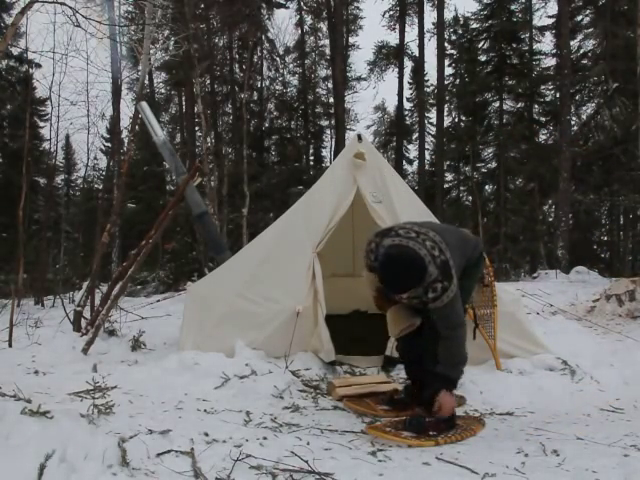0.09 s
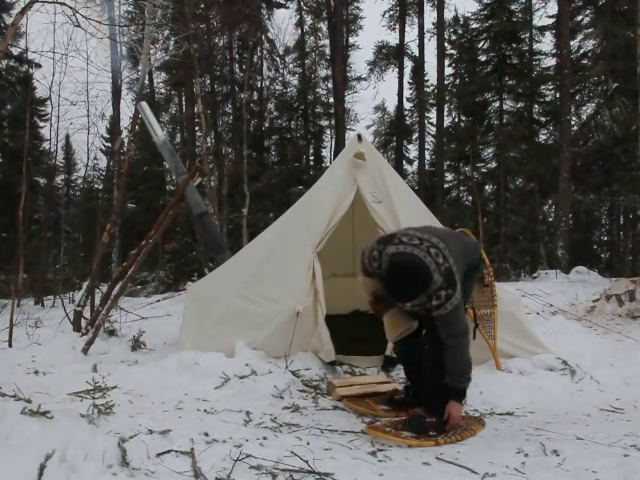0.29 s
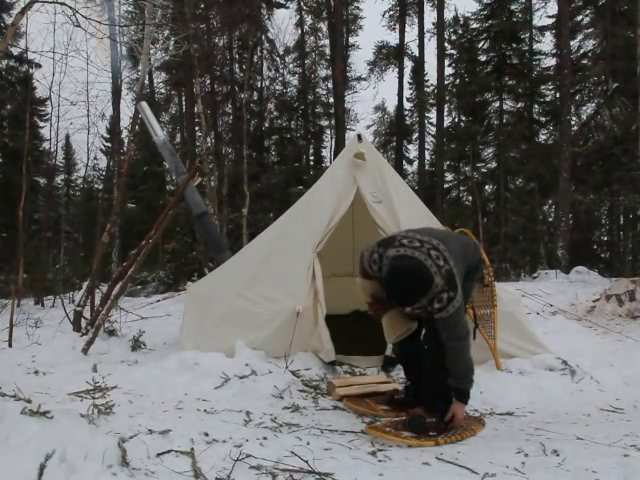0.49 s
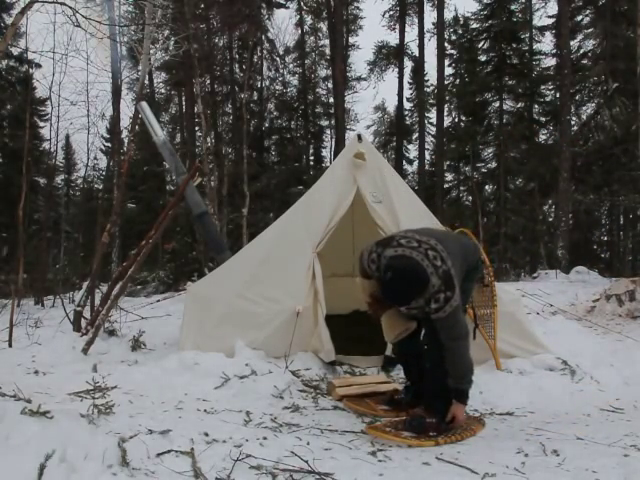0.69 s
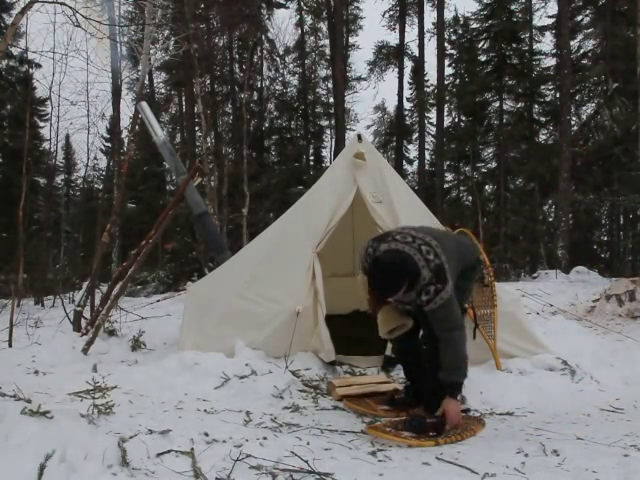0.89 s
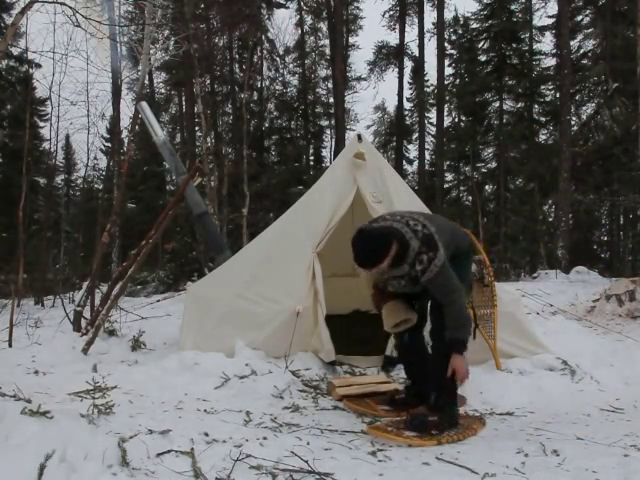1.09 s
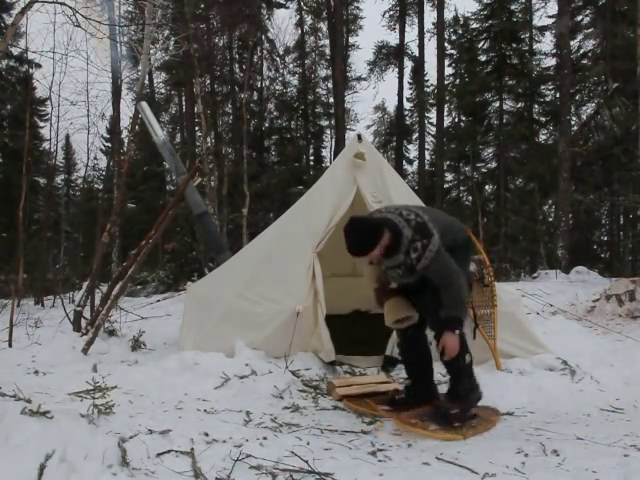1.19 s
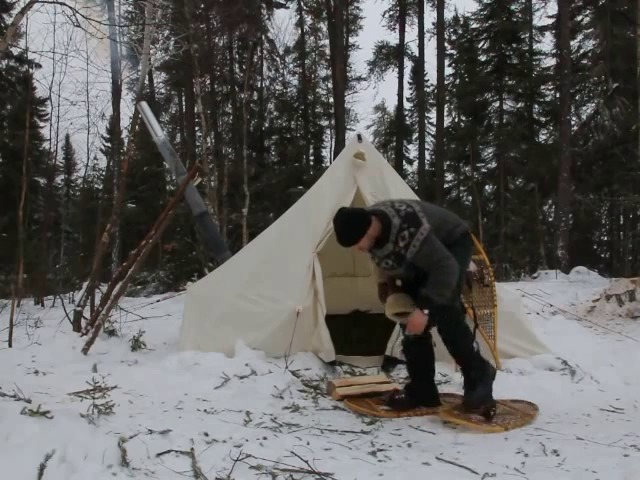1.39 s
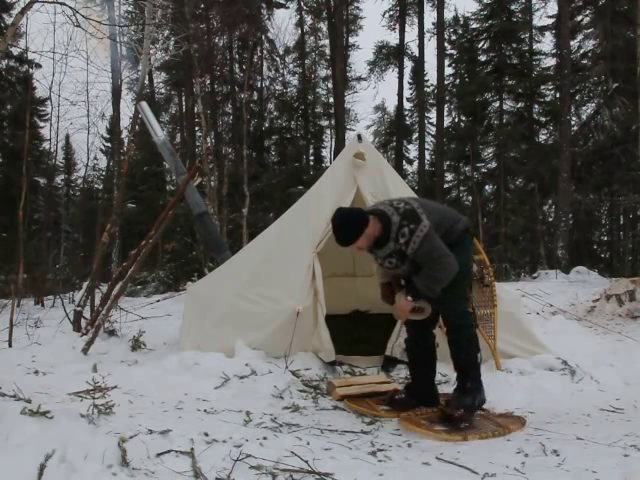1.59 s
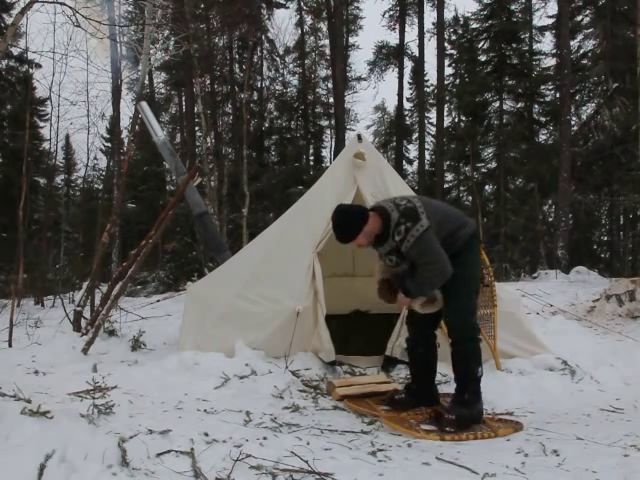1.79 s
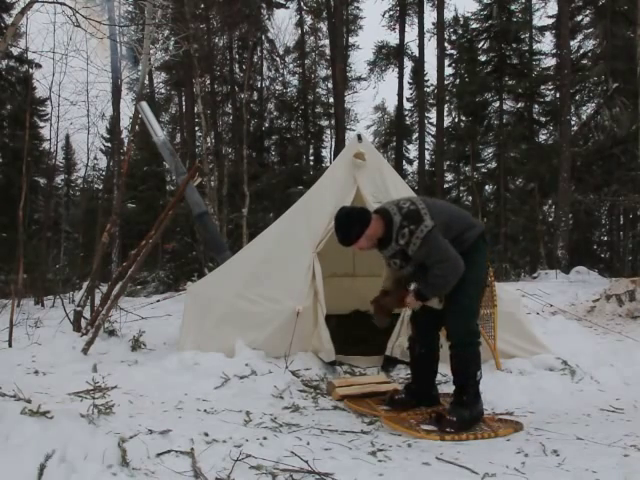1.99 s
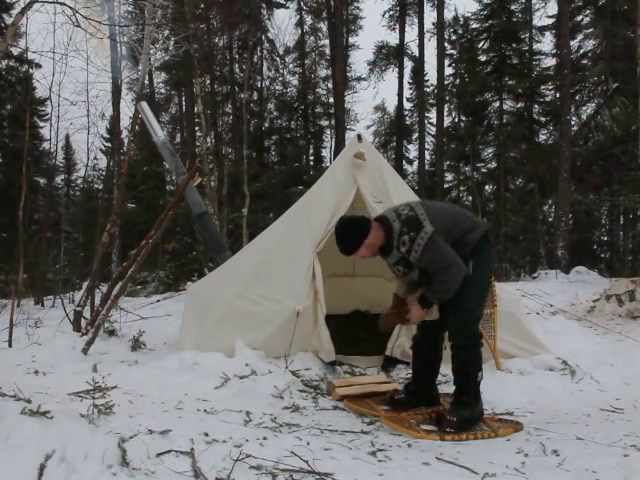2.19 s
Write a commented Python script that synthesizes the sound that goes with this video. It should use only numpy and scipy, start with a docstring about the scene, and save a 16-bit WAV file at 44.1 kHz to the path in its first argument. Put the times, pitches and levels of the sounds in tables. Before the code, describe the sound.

A wooden snowshoe is tugged and shifted on crusted snow. A faint tick comes first, then a hard knock at 0.2 s and lighter rattling taps. Sharp snaps and knocks cluster at 0.55-0.7 s. From 0.87 s, clacks, icy cracks and gritty crunching thicken, strongest to about 1.5 s, then continue in broken patches and fade after 2 s. Dry outdoor air, faint steady camera noise.

```python
"""Wooden knocks come first, faint and then hard, as a person tugs a snowshoe binding loose on crusted snow.
Frame and lacing are struck resonators; ice crust and twigs snap as short noise bursts, and a settling
shoe thumps as a damped low oscillation. Snow crunches as dense random grains and short pitched rings.
The snowy forest is dry and quiet: a brief scattered tail, over the faint coloured noise of the camera."""
import sys
import numpy as np
from scipy import signal
from scipy.io import wavfile
from scipy.ndimage import uniform_filter1d

SR = 44100
rng = np.random.default_rng(int(sys.argv[2]) if len(sys.argv) > 2 else 0)


def convert_level_to_amplitude(level_db):
    """Map a level in decibels to its linear amplitude factor."""
    exponent = np.asarray(level_db, float) / 20
    return 10 ** exponent


def int16_out(signal):
    """Quantize to a 16-bit WAV file."""
    q = np.round(np.clip(np.atleast_2d(signal).T, -1, 1) * 32767)
    wavfile.write(sys.argv[1], SR, q.astype(np.int16))


N = 99225  # samples


# Modes of the wooden frame: (f/Hz, level/dB before weighting by pitch and decay, 60 dB decay time t60/s)
FRAME_MODES = [(538, 5, 0.015), (750, 5, 0.012), (937, -0.5, 0.036), (1150, 5, 0.012), (1450, -30, 0.016),
               (1652, -0.5, 0.021)]


def knock(peak_db, hz, slip_s, noise, draw):
    """Stick-slip excitation of modes: random slips ring the frame modes near the pitch and the spot itself."""
    slips_per_s, soft_hz = 1500, 3000
    reach_octaves, spot_width_hz, frame_db = 1.36, 550, 3  # frame_db: frame peak relative to spot peak
    rise_s = 0.3 * slip_s

    slips = draw < slips_per_s / SR
    slips[int(rise_s * SR)] = True  # at least one slip
    impulses = slips * np.sign(noise) * (0.5 + abs(noise))
    drive = burst(slip_s, impulses, rise_s)
    drive = signal.lfilter(*signal.butter(2, soft_hz, fs=SR), drive)

    frame = 0
    for mode_hz, mode_db, t60 in FRAME_MODES:
        octaves_away = np.log2(mode_hz / hz)
        gain = convert_level_to_amplitude(mode_db - 6 * (octaves_away / reach_octaves) ** 2) * t60 / 0.03
        frame = frame + gain * resonate(drive, mode_hz, 2.2 / t60)  # bandwidth is 2.2 / t60
    spot = resonate(resonate(drive, hz, spot_width_hz), hz, 2 * spot_width_hz)
    return peaked(peaked(spot, 0) + peaked(frame, frame_db), peak_db)


# Knocks and creaks of the wooden frame: (t/s, dry peak level/dB, pitch f/Hz, length of the slip/s)
FRAME_KNOCKS = [(0.06, -38, 800, 0.0028), (0.176, -22.5, 557, 0.003), (0.2148, -9.5, 1170, 0.006),
                (0.245, -24, 1250, 0.0044), (0.287, -22, 1270, 0.0025), (0.319, -21.5, 1300, 0.0027),
                (0.38, -22, 1290, 0.0077), (0.414, -36, 1230, 0.0029), (0.433, -24, 1190, 0.0013),
                (0.562, -18.5, 1290, 0.0046), (0.5785, -27, 1380, 0.0054), (0.593, -24.5, 1110, 0.0065),
                (0.627, -11, 1050, 0.0046), (0.651, -17.5, 1260, 0.004), (0.671, -22.5, 1310, 0.0063),
                (0.695, -31.5, 670, 0.0029), (0.753, -32.5, 1400, 0.0076), (0.874, -28, 1150, 0.0068),
                (0.892, -12.5, 1560, 0.0017), (0.902, -11.5, 1340, 0.007), (0.932, -22, 1910, 0.0063),
                (0.982, -18.5, 1880, 0.0035), (0.993, -25, 1080, 0.0047), (1.019, -16.5, 2160, 0.0016),
                (1.033, -17, 510, 0.003), (1.139, -26.5, 560, 0.004), (1.165, -17, 1230, 0.0037),
                (1.188, -15.5, 1480, 0.0037), (1.2, -22.5, 1070, 0.0038), (1.213, -19, 1430, 0.0051),
                (1.244, -19, 930, 0.0033), (1.258, -13, 920, 0.0077), (1.33, -17.5, 1210, 0.0048),
                (1.4105, -17.5, 1470, 0.002), (1.469, -24.5, 990, 0.003), (1.603, -19.5, 1280, 0.0049),
                (1.635, -19, 617, 0.0039), (1.677, -19, 1450, 0.0059), (1.824, -15.5, 400, 0.0049),
                (1.892, -18, 1460, 0.0039), (1.933, -23, 930, 0.0047), (1.987, -17.5, 1500, 0.0036),
                (2.0, -26.5, 1450, 0.0031), (2.029, -27, 1480, 0.004), (2.073, -32, 695, 0.0085)]


def frame_knocks():
    """Superposition of the frame's stick-slip events, each with its own random drive."""
    layer = np.zeros(N)
    noises, draws = rng.standard_normal((99, 3000)), rng.random((99, 3000))
    for (t, *row), noise, draw in zip(FRAME_KNOCKS, noises, draws):
        add(layer, t, knock(*row, noise, draw))
    return layer


# Spectrum of a snap: (f/Hz, gain/dB)
SNAP_SPECTRUM = [(1200, -39.5), (2200, -2), (4000, -2), (8000, 1), (12000, -10), (15500, -9.5),
                 (17000, -49)]


def snap(peak_db, hz, noise, grit):
    """Brittle fracture as a gritty noise burst, with a broad resonance about its centre frequency."""
    fall_s, rise_s, grit_db = 0.0028, 0.000654, 4.5
    centre_db, sharpness = 7, 3.0  # sharpness: centre over width
    roughness = convert_level_to_amplitude(grit_db * np.repeat(grit, 24))
    drive = burst(fall_s, noise * roughness, rise_s)
    centre = convert_level_to_amplitude(centre_db) * resonate(drive, hz, hz / sharpness)
    return peaked(colour(drive + centre, SNAP_SPECTRUM), peak_db)


# Snaps of ice crust and twigs: (t/s, dry peak level/dB, centre f/Hz)
CRUST_SNAPS = [(0.1575, -32, 3000), (0.176, -30, 3670), (0.2155, -13, 4830), (0.2243, -21, 6100),
               (0.2573, -27, 5870), (0.3069, -21.5, 3040), (0.3835, -19.5, 3070), (0.415, -24, 3940),
               (0.4657, -29.5, 5970), (0.5172, -24.5, 5360), (0.551, -8.5, 7400), (0.595, -21.5, 3850),
               (0.627, -13, 3300), (0.6704, -23, 3000), (0.6833, -15, 3740), (0.686, -6.5, 4240),
               (0.69, -16, 7940), (0.6957, -21.5, 8000), (0.7336, -24.5, 4060), (0.7547, -25, 4140),
               (0.833, -27, 4670), (0.8733, -22, 3700), (0.8949, -17, 7350), (0.9334, -18.5, 3360),
               (0.9639, -15.5, 3350), (0.9817, -16, 3220), (1.0117, -34, 8400), (1.018, -11.5, 3170),
               (1.0253, -33, 8900), (1.0555, -20, 4540), (1.0903, -14, 7450), (1.167, -11.5, 3100),
               (1.191, -10, 3770), (1.292, -19, 3970), (1.3525, -24, 3280), (1.3838, -16.5, 7500),
               (1.39, -24.5, 7600), (1.4394, -24.5, 4200), (1.468, -18.5, 3960), (1.4818, -24, 4000),
               (1.7264, -16, 3350), (1.748, -20, 5170), (1.7803, -17.5, 9850), (1.9879, -23, 3450)]


def crust_snaps():
    """Superposition of brittle fractures, each with its own noise."""
    layer = np.zeros(N)
    noises, grits = rng.standard_normal((99, 2400)), rng.standard_normal((99, 100))
    for (t, *row), noise, grit in zip(CRUST_SNAPS, noises, grits):
        add(layer, t, snap(*row, noise, grit))
    return layer


def thump(peak_db, hz):
    """Heavily damped oscillation: a low push that dies within a few cycles."""
    cycles = 1.9
    u = np.arange(3000) / SR * hz  # time in cycles
    return peaked(np.sin(2 * np.pi * u) * u * np.exp(-3 * u / cycles), peak_db)


# Dull thumps of a shoe settling: (t/s, dry peak level/dB, pitch f/Hz)
SHOE_THUMPS = [(.216, -19.5, 473), (.628, -24.5, 334), (0.89, -20, 526), (1.355, -25, 276),
               (1.824, -27, 380)]


def shoe_thumps():
    """Superposition of the damped pushes of a settling shoe."""
    layer = np.zeros(N)
    for t, *row in SHOE_THUMPS:
        add(layer, t, thump(*row))
    return layer


def scatter(hits):
    """Diffuse scattering: a short, exponentially decaying noise tail is added to the hits."""
    tail_db, t60 = -17, 0.04  # energy of the tail relative to the direct sound; decay time in s
    t = np.arange(4000) / SR
    tail = rng.standard_normal(4000) * convert_level_to_amplitude(-60 * t / t60)
    return hits + convert_level_to_amplitude(tail_db) * signal.oaconvolve(hits, tail / np.linalg.norm(tail))[:N]


# Spectrum of the low crunch: (f/Hz, gain/dB)
CRUNCH_SPECTRUM = [(47, -58), (150, -21), (311, -3), (831, -1.5), (917, -2.5), (2410, -8.5), (4000, -8.5),
                   (5600, -59)]
# Spectrum of the hiss of fine grains: (f/Hz, gain/dB)
HISS_SPECTRUM = [(1060, -11), (1800, -2), (2360, -7.5), (3780, -6), (11700, -10.5), (15600, -21),
                 (16500, -62)]


def snow():
    """Granular emission: low crunch and fine hiss, each part noisy grains and part pitched rings."""
    clod_share, chip_share = 0.65, 0.35  # pitched share of the power
    crunch = grains(column=1, points=CRUNCH_SPECTRUM, per_s=700, spread_db=2.0,
                    clump_db=4.5, clump_s=0.0027, grain_s=0.00067)
    # compacted clods of snow
    clods = pitched_pieces(column=1, points=CRUNCH_SPECTRUM, range_hz=(300, 2400), cycles=6.0,
                           per_s=550, spread_db=2.5, count=24)
    hiss = grains(column=2, points=HISS_SPECTRUM, per_s=2600, spread_db=3.6,
                  clump_db=0.8, clump_s=0.006, grain_s=0.0006)
    # ticking chips of ice
    chips = pitched_pieces(column=2, points=HISS_SPECTRUM, range_hz=(2210, 13830), cycles=3.4,
                           per_s=1400, spread_db=1.0, count=24)
    low = np.sqrt(1 - clod_share) * crunch + np.sqrt(clod_share) * clods
    high = np.sqrt(1 - chip_share) * hiss + np.sqrt(chip_share) * chips
    return low + high


def grains(column, points, per_s, spread_db, clump_db, clump_s, grain_s):
    """Shot noise: random grains, summed in power, modulate noise that swells in clumps."""
    size = random_sizes(per_s, spread_db, 4)
    shape = np.exp(-np.arange(600) / SR / grain_s)
    span = max(int(clump_s * SR), 1)
    clumps = evened(uniform_filter1d(uniform_filter1d(rng.standard_normal(N), span), span))
    envelope = np.sqrt(abs(signal.oaconvolve(size ** 2, shape ** 2)[:N]))
    noise = envelope * rng.standard_normal(N) * convert_level_to_amplitude(clump_db * clumps)
    return evened(colour(noise, points)) * pressure(column)


def pitched_pieces(column, points, range_hz, cycles, per_s, spread_db, count):
    """Impulse response of small resonators: each piece rings briefly at one of count pitches."""
    size = random_sizes(per_s, spread_db, 3)
    kind, out = rng.integers(0, count, N), np.zeros(N)
    for k, hz in enumerate(np.geomspace(*range_hz, count)):
        u = np.arange(1500) / SR * hz  # time in cycles
        ring = np.sin(2 * np.pi * u) * u * np.exp(-3 * u / cycles) * hz
        out += signal.oaconvolve(size * (kind == k), ring)[:N]
    return evened(colour(out, points)) * pressure(column)


def random_sizes(per_s, spread_db, limit):
    """Poisson-like arrivals: impulses at random times, with exponentially spread levels up to a limit."""
    size = convert_level_to_amplitude(spread_db * np.minimum(rng.exponential(1, N), limit))
    return size * (rng.random(N) < per_s / SR)


# Slow course of the crushing: (t/s, low crunch level/dB, fine hiss level/dB)
CRUSH_COURSE = [(0, -55, -59.5), (.15, -56, -57), (.45, -52.5, -51.5), (.49, -61.5, -56), (.6, -46, -45.5),
                (.78, -61.5, -53.5), (.86, -42.5, -44), (1.02, -41.5, -39.5), (1.2, -41, -38),
                (1.5, -44.5, -37), (1.62, -44.5, -46.5), (1.85, -42.5, -43), (1.98, -46, -48),
                (2.04, -53, -55), (2.25, -53, -53.5)]
# Patches of crust giving way: (start t/s, length/s, low crunch level/dB, fine hiss level/dB)
CRUST_BREAKS = [(0.3, 0.01, -40, -43), (0.314, 0.023, -47, -43), (0.454, 0.01, -67, -44.5),
                (0.681, 0.014, -38, -39), (0.891, 0.037, -34, -25.5), (1.073, 0.08, -45.5, -35.5),
                (1.17, 0.033, -36, -32.5), (1.232, 0.025, -27, -37), (1.286, 0.059, -27.5, -37.5),
                (1.37, 0.021, -54, -37), (1.417, 0.015, -33, -35), (1.448, 0.053, -39, -34.5),
                (1.581, 0.031, -36, -37.5), (1.634, 0.068, -36.5, -37.5), (1.711, 0.042, -35.5, -35),
                (1.778, 0.012, -34.5, -38.5), (1.815, 0.031, -38, -35), (1.909, 0.016, -31, -35.5),
                (1.954, 0.0094, -30, -37.5), (2.119, 0.02, -49, -50.5)]


def pressure(column):
    """Addition of powers: the slow crushing plus the gated patches, returned as an amplitude gain."""
    rise_s, fall_s = 0.0015, 0.006
    t = np.arange(N) / SR
    power = convert_level_to_amplitude(2 * np.interp(t, *np.transpose(CRUSH_COURSE)[[0, column]]))
    for row in CRUST_BREAKS:
        start, end = row[0], row[0] + row[1]
        gate = np.minimum((t - start) / rise_s, (end - t) / fall_s + 0.5)
        power = power + convert_level_to_amplitude(2 * row[column + 1]) * np.clip(gate, 0, 1) ** 2
    return np.sqrt(power)


# Spectrum of the background: (f/Hz, gain/dB)
FLOOR_SPECTRUM = [(24, -87), (40, -16), (181, 1), (1400, -2.5), (2040, -12.5), (3550, -6.5), (11900, -44),
                  (15300, -33), (16500, -59)]


def floor():
    """Stationary coloured noise of forest and camera."""
    return convert_level_to_amplitude(-56) * evened(colour(rng.standard_normal(N), FLOOR_SPECTRUM))


def evened(x):
    """Power normalisation: scales to rms 1."""
    return x / np.sqrt(np.mean(x ** 2) + 1e-20)


def peaked(x, db):
    """Peak normalisation: scales to a peak level in dB."""
    return convert_level_to_amplitude(db) * x / (abs(x).max() + 1e-20)


def add(mix, s, sound):
    """Linear superposition: mixes a sound in at a time in seconds."""
    part = mix[round(s * SR):][:len(sound)]
    part += sound[:len(part)]


def colour(x, points):
    """Minimum-phase filtering: a causal filter that follows a spectrum of (Hz, dB) points."""
    f, db = np.transpose(points)
    hz = abs(np.fft.fftfreq(4096, 1 / SR))
    gain_db = np.interp(np.log(hz + 1), np.log(f), db)
    log_gain = np.log(convert_level_to_amplitude(np.maximum(gain_db, -100)))
    # the Hilbert transform of the log gain yields the phase
    taps = np.fft.ifft(np.exp(np.conj(signal.hilbert(log_gain)))).real[:2048]
    return signal.oaconvolve(x, taps)[:len(x)]


def resonate(x, hz, width_hz):
    """Second-order resonance with gain 1 at its centre."""
    return signal.lfilter(*signal.iirpeak(min(hz, 0.45 * SR), max(hz / width_hz, 0.3), SR), x)


def burst(fall_s, carrier, rise_s):
    """Amplitude envelope: a squared rise, then exponential decay, 20 dB down fall_s later."""
    t = np.arange(len(carrier)) / SR
    rise = np.minimum(t / rise_s, 1) ** 2
    fall = convert_level_to_amplitude(-20 * np.maximum(t - rise_s, 0) / max(fall_s, 0.0005))
    return rise * fall * carrier


def scene():
    """Linear superposition: all hits with their scattered tail, crushing snow and background."""
    hits = frame_knocks() + crust_snaps() + shoe_thumps()
    return (scatter(hits) + snow() + floor())[None]


# Resonances of the camera housing: (f/Hz, width/Hz, level/dB of the resonance added to the direct sound)
HOUSING = [(1390, 160, -4), (3650, 300, -7)]


def housing(dry):
    """Parallel resonance: the modes of the camera housing add to the direct sound."""
    return dry + sum(convert_level_to_amplitude(db) * resonate(dry, hz, width_hz) for hz, width_hz, db in HOUSING)


def top_cut(x):
    """Nothing passes above the cut-off."""
    return signal.sosfilt(signal.butter(12, 16840, fs=SR, output="sos"), x)


def record(dry):
    """Linear filtering in series: housing resonances, low cut and band limit shape the finished mix."""
    low_cut_hz, edge_hz = 111, 16700
    mix = housing(dry)
    mix = signal.lfilter(*signal.butter(2, low_cut_hz, "high", fs=SR), mix)
    band_limit = signal.firwin(255, edge_hz, window=("kaiser", 9), fs=SR)
    mix = signal.oaconvolve(mix, band_limit[None], "same")
    return top_cut(mix)


dry = scene()
out = record(dry)
int16_out(out)
```